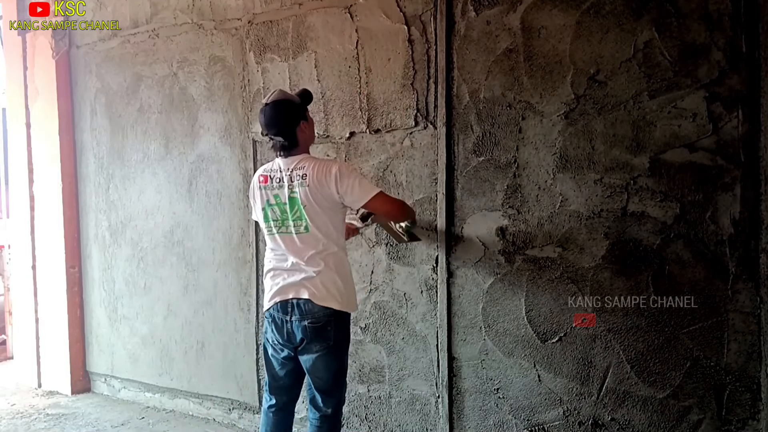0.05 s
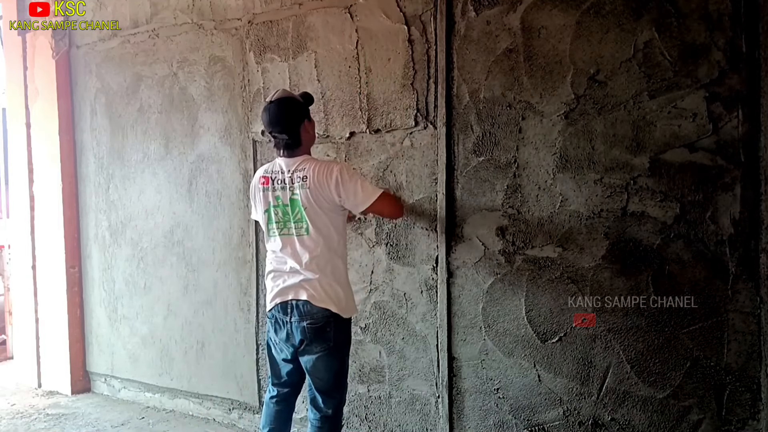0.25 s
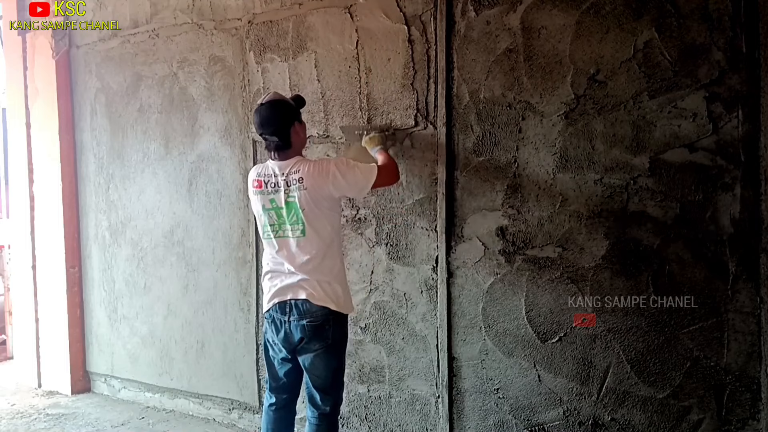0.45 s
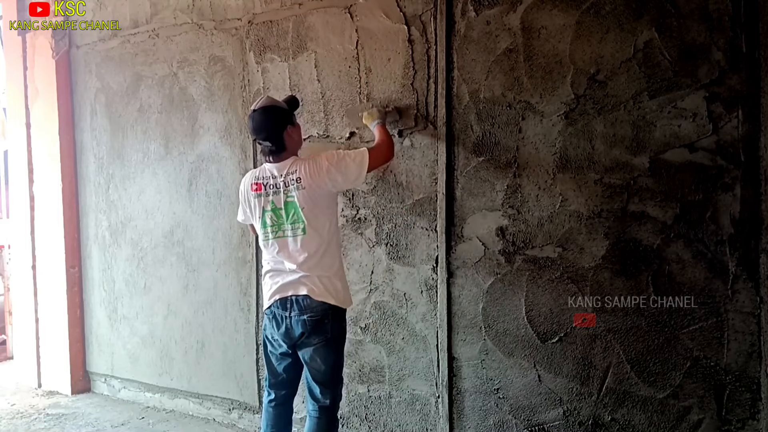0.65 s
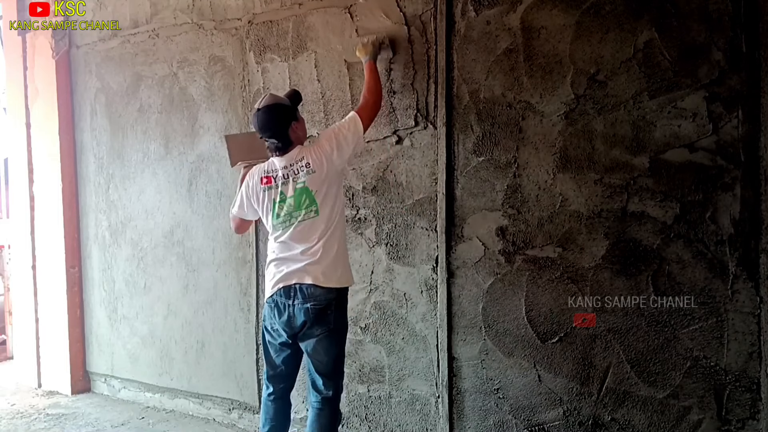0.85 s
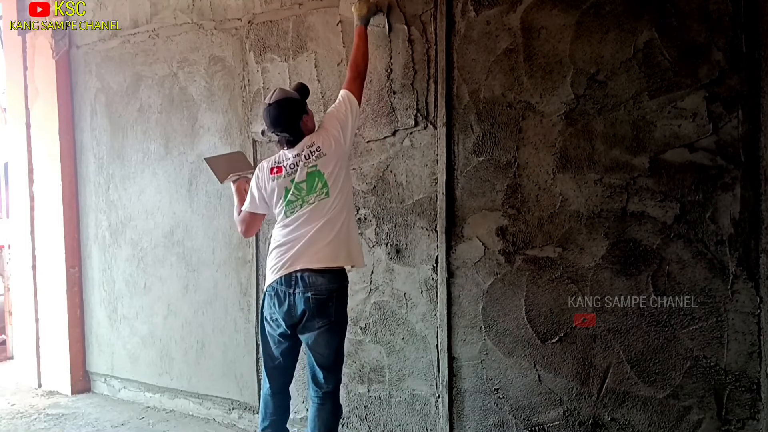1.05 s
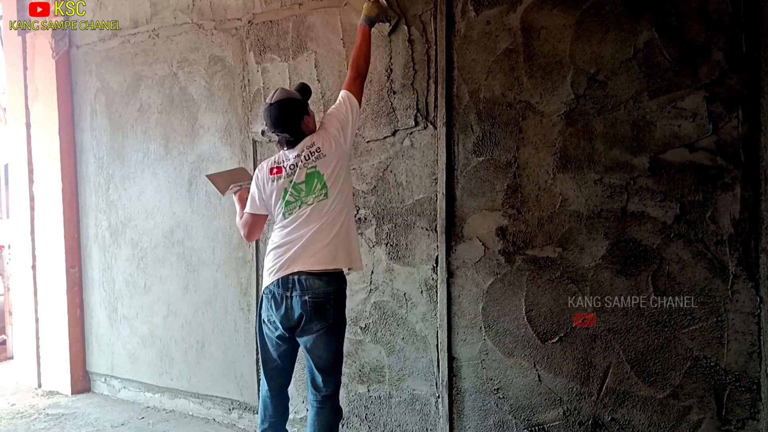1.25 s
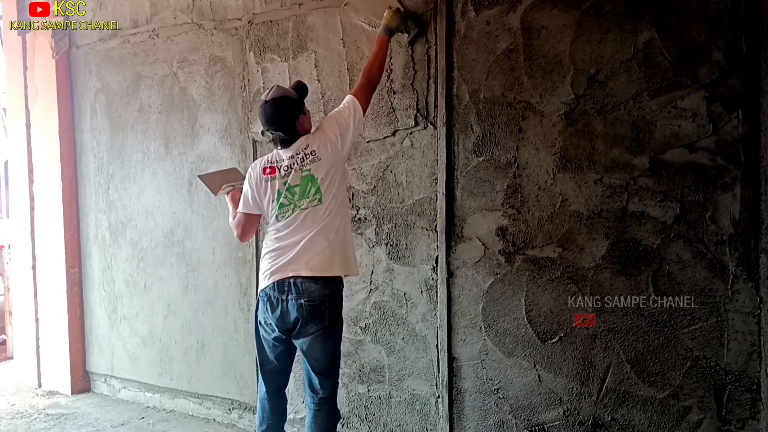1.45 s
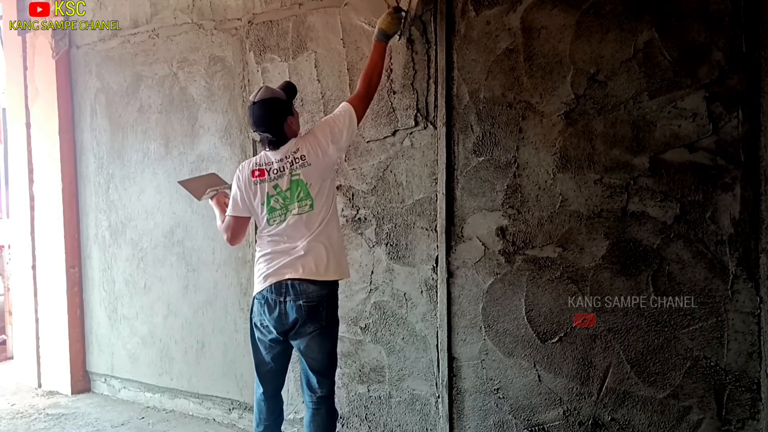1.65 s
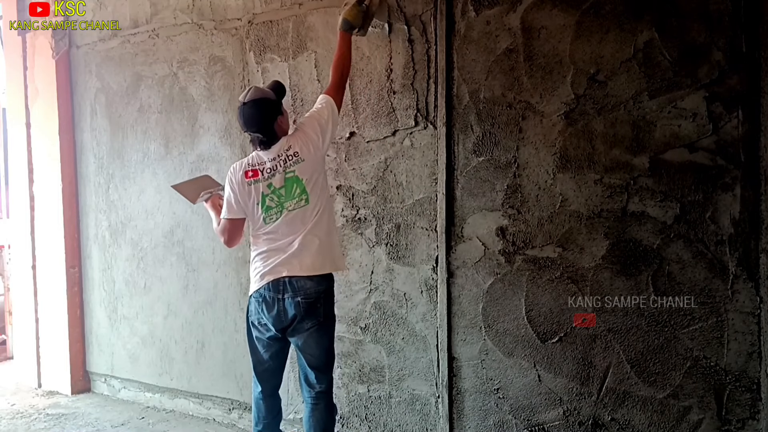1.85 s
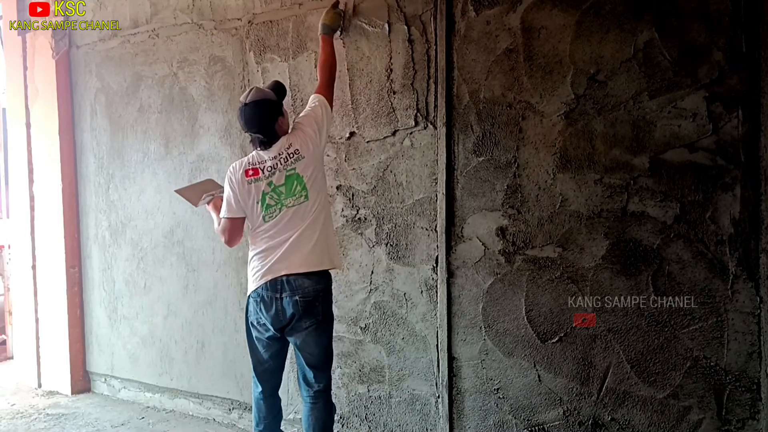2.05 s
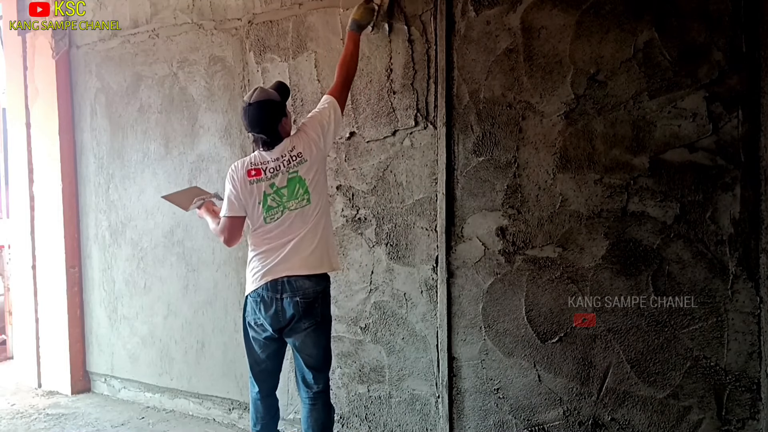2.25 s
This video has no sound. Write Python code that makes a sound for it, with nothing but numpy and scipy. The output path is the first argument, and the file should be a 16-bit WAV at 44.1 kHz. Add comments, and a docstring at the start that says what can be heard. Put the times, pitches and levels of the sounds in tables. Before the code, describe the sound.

A steel trowel knocks on a hand board and scrapes up gritty mortar at 0.2 seconds, over a brief low hum, then again, louder, at 0.5. From 0.8 it spreads the mortar on a wall in soft, hissing strokes, with faint bumps and pebble clinks around 1.4. Two faint high chirps follow after 2.1, then a short rasp at 2.3. The bare room echoes, with low outdoor rumble throughout.

```python
"""A plasterer's steel trowel at work in a bare, echoing room, heard on a close pair of microphones.
Twice it knocks on the hand board and scrapes up mortar, sand grains cracking under the steel; then he
presses the load on the wall and spreads it in long, soft, gritty strokes. The work sounds well back in
the room; pebble clinks, low bumps and two faint high chirps come through drier and seem nearer.
Under it all lie a low outdoor rumble and one short swell of hum."""
import sys
import numpy as np
from scipy import signal
from scipy.fft import rfft, irfft
from scipy.io import wavfile
from scipy.ndimage import uniform_filter1d, map_coordinates

SR = 44100
rng = np.random.default_rng(int(sys.argv[2]) if len(sys.argv) > 2 else 0)


def wav_record(signal):
    """Record a signal, one row per channel, as 16-bit PCM in the file named by sys.argv[1]."""
    frames = np.transpose(np.atleast_2d(signal))
    bounded = np.clip(frames, -1, 1)
    # unit amplitude maps onto the largest positive 16-bit level
    quanta = np.round(bounded * 32767).astype(np.int16)
    wavfile.write(sys.argv[1], SR, quanta)


N = 105840

# rumble from outdoors (frequency [Hz], level [dB])
RUMBLE_SPECTRUM = [(20, -24), (40, -19), (60, -3.5), (82, -1.5), (150, -2), (230, -6.5), (350, -15),
                   (900, -27), (2000, -26), (4000, -37), (15000, -46.5)]
# spreading strokes on the wall (time [s], length [s], level [dB], tilt [dB/octave])
SPREAD_STROKES = [(-.06, 0.086, -52.5, -1.5), (0.845, 0.15, -50, 1), (0.987, 0.23, -47.5, 0.06),
                  (1.214, 0.24, -57, 0.5), (1.464, 0.043, -42.5, 0.5), (1.548, 0.11, -49.5, 1),
                  (1.643, 0.081, -45.5, 1), (1.828, 0.036, -52.5, -0.5), (1.957, 0.06, -56, -2),
                  (2.11, 0.32, -52.5, 0.5)]
# mortar under the flat blade (frequency [Hz], level [dB])
SPREAD_SPECTRUM = [(120, -2), (450, -3.5), (900, -11), (1400, 2.5), (2600, 3.5), (4500, -2.5), (8000, -7),
                   (15000, -8)]
# resonances of the flat blade on the wall (frequency [Hz], width [Hz], level [dB])
SPREAD_MODES = [(561, 140, 11), (866, 95, 9), (1950, 250, -5)]
# pebbles tick on the steel (time [s], level [dB])
PEBBLE_HITS = [(0.027, -58), (1.388, -39.5), (1.486, -46.5)]
# modes of the blade (frequency [Hz], level [dB], t60 [s])
BLADE_MODES = [(2650, -15, 0.017), (3086, 1, 0.074), (3500, 5, 0.016), (3800, -7, 0.011), (7800, -14, .03),
               (9300, -11, 0.033)]
# crack of a pebble on steel (frequency [Hz], level [dB])
PEBBLE_SPECTRUM = [(300, 7), (1800, -30), (2600, -3), (3700, -1), (4800, -13), (9000, -8), (15000, -9)]
# mortar and trowel thud on board or wall (time [s], length [s], level [dB], centre [Hz], width [Hz])
MORTAR_SLAPS = [(0.182, 0.033, -40, 257, 220), (0.529, 0.022, -25, 589, 200),
                (1.377, 0.026, -53.5, 555, 590), (1.483, .012, -48, 825, 500),
                (1.702, 0.013, -44.5, 904, 181)]
# the trowel knocks on the board (time [s], level [dB], t60 [s], tilt [dB/octave])
BOARD_KNOCKS = [(0.1858, -18, 0.0093, -0.5), (0.527, -17.5, 0.097, -1)]
# crack of steel on the board (frequency [Hz], level [dB])
KNOCK_SPECTRUM = [(70, -30), (200, -7), (500, 5), (2200, 6.5), (3200, -6), (8000, -9), (15000, -8)]
# force of the blade on the board, one curve a scoop (time [s], level [dB])
SCOOP_FORCES = [
    [(.186, -51), (.196, -34), (.201, -21), (.228, -22), (.275, -27.5), (.315, -35), (.35, -52), (.40, -70)],
    [(.513, -54), (.526, -39), (.529, -34.5), (.56, -22.5), (.598, -18), (.65, -27.5), (.668, -34.5),
     (.74, -36), (.79, -63)],
]
# brightness of each scoop (tilt [dB/octave])
SCOOP_TILTS = [0.26, -0.4]
# sand under the blade (frequency [Hz], level [dB])
SCOOP_SPECTRUM = [(100, -39.5), (230, -23), (400, -4.5), (750, -5.5), (1250, 0), (2300, -4), (3200, -6.5),
                  (4300, -12), (8000, -15.5), (15000, -18.5)]
# resonances of blade and board pressed together (frequency [Hz], width [Hz], level [dB])
SCOOP_MODES = [(1136, 18, -4), (1216, 38, 6), (1655, 32, 12.5), (1988, 55, 12), (2400, 180, 5.5),
               (3258, 27, 11.5)]
# the loaded blade drags off the board
# (time [s], length [s], level [dB], tilt [dB/octave], ring start [Hz], ring end [Hz], ring level [dB])
DRAG_STROKES = [(0.265, 0.031, -35.5, 2, 398, 473, -5.5), (0.334, 0.0578, -44, 0, 1852, 1990, 0),
                (0.616, 0.0709, -27.5, 2, 800.7, 700, -5), (0.684, 0.078, -31, 1.55, 700, 858, -7.5)]
# rasp of wet sand (frequency [Hz], level [dB])
DRAG_SPECTRUM = [(100, -23), (220, -13), (340, -5.5), (850, 0), (1300, -11), (2400, -6.5), (3500, -15.5),
                 (6000, -31.5), (15000, -32)]
# resonances of the board as the blade leaves (frequency [Hz], width [Hz], level [dB])
BOARD_MODES = [(347, 48, 7.5), (708, 62, 4.5), (1635, 70, 4.5), (1972, 54, 11.5), (2200, 90, 3)]
# low bumps (time [s], length [s], level [dB], centre [Hz])
LOW_BUMPS = [(0.531, 0.025, -33, 290.3), (0.844, 0.045, -40.5, 195), (0.987, 0.025, -45.5, 90),
             (1.553, 0.035, -49, 79.6), (1.73, 0.024, -46, 125), (1.943, 0.029, -45, 102)]
# faint chirps (time [s], length [s], middle pitch [Hz], arch [Hz], glide middle to end [Hz], level [dB])
HIGH_CHIRPS = [(2.099, 0.037, 3775, 499.5, 1, -50.5), (2.229, 0.044, 3630, 1, -230, -48.5)]
# the blade edge bites the rough wall (time [s], length [s], level [dB], tilt [dB/octave])
BITE_STROKES = [(2.291, 0.032, -35.5, -2), (2.333, 0.041, -41.5, 2.5)]
# rasp of the edge (frequency [Hz], level [dB])
BITE_SPECTRUM = [(200, -18.5), (700, -16), (1050, -2), (2200, 1), (3200, -5), (5000, -10.5), (15000, -13)]
# decay of the bare room (frequency [Hz], t60 [s])
ROOM_DECAY = [(150, 0.64), (700, 0.66), (2000, 0.57), (5000, 0.39), (14000, 0.24)]
# left microphone minus right (frequency [Hz], level [dB])
LEFT_MINUS_RIGHT = [(60, -2.5), (300, 0), (1300, -0.8), (2400, -1), (4400, -1.5), (8000, -3.5), (13000, 3)]

SCOOP_GRAINS_PER_S, WALL_GRAINS_PER_S = 5000, 9000
ROOM_BUILD_S, EARLY_DECAY_S, EARLY_GAIN, SPOT_STEP_S = 0.0008, 0.044, 1.7, 0.012
MIC_LAG_S, ECHO_APART_HZ = 0.00007, 625
LOW_CUT_HZ, TOP_CUT_HZ = 32, 15600


def undb(db):
    """Decibels to gain."""
    return 10 ** (np.asarray(db) / 20)


def unit(x):
    """Scale to rms 1."""
    return x / np.sqrt(np.mean(x ** 2) + 1e-20)


def on_log(points, hz):
    """Read (frequency, value) points on a log-frequency axis."""
    p = np.array(points, float)
    return np.interp(np.log(hz + 1), np.log(p[:, 0]), p[:, 1])


def freqs():
    """Frequencies of the padded spectrum."""
    return np.arange(N + 1) * SR / (2 * N)


def colour(x, spectrum, modes=(), tilt=0):
    """Causal filter of unit power: a broad spectrum, resonances on top, and a tilt about 1 kHz."""
    f = freqs()
    power = 1 + sum(undb(db) ** 2 / (1 + (2 * (f - hz) / width) ** 2) for hz, width, db in modes)
    octaves = np.log2(np.clip(f, 200, 8000) / 1000)
    gain = unit(undb(on_log(spectrum, f) + tilt * octaves) * np.sqrt(power))
    cepstrum = irfft(np.log(gain))
    cepstrum[1:N] *= 2  # minimum phase: nothing rings before its hit
    cepstrum[N + 1:] = 0
    return irfft(rfft(x, 2 * N) * np.exp(rfft(cepstrum)))[..., :N]


def walk(rate_hz):
    """Smooth random wander of rms 1."""
    span = max(int(SR / rate_hz), 2)
    smoothed = uniform_filter1d(rng.standard_normal(N), span, mode="wrap")
    return unit(uniform_filter1d(smoothed, span, mode="wrap"))


def envelope(t, start, length, attack, release):
    """Rise, hold, then an exponential fall."""
    return np.clip((t - start) / attack, 0, 1) * np.exp(-np.maximum(t - start - length, 0) / release)


def grit(grains_per_s, spread_db, judder_db, judder_hz):
    """Sand grains of uneven size crack under steel that sticks and slips."""
    hit = rng.random(N) < grains_per_s / SR
    size = undb(spread_db * np.minimum(rng.exponential(size=N), 4)) * rng.choice([-1, 1], N)
    return unit(hit * size * undb(judder_db * walk(judder_hz)))


def resonance(hz, width_hz):
    """A randomly driven resonance of rms 1 whose centre can move."""
    pole = np.exp(-np.pi * abs(width_hz) / SR)
    drift = signal.lfilter([1], np.poly([pole, pole]), rng.standard_normal((2, N)))
    carrier = np.exp(2j * np.pi * np.cumsum(hz) / SR)
    return unit(((drift[0] + 1j * drift[1]) * carrier).real)


def outdoor_rumble(level_db=-51, apart_hz=700):
    """A restless low rumble: alike at both microphones in the bass, unrelated in the treble."""
    mid, side = rng.standard_normal((2, N))
    side = irfft(rfft(side, 2 * N) * freqs() / np.hypot(freqs(), apart_hz))[:N]
    pair = np.array([mid + side, mid - side])
    return undb(level_db) * unit(colour(pair, RUMBLE_SPECTRUM)) * undb(walk(7.7))


def wall_spreads(t):
    """Mortar hisses between the flat blade and the wall."""
    sand = grit(WALL_GRAINS_PER_S, spread_db=6.0, judder_db=-1.5, judder_hz=90)
    out = 0
    for start, length, db, tilt in SPREAD_STROKES:
        stroke = sand * envelope(t, start, length, attack=0.047, release=0.02)
        out += undb(db) * colour(stroke, SPREAD_SPECTRUM, SPREAD_MODES, tilt)
    return out


def pebble_clinks(t):
    """A pebble cracks against the steel and the blade rings briefly."""
    out = 0
    for start, db in PEBBLE_HITS:
        age = np.maximum(t - start, 0)
        ring = sum(undb(mode_db - 60 * age / t60) * np.sin(2 * np.pi * hz * age)
                   for hz, mode_db, t60 in BLADE_MODES)
        crack = rng.standard_normal(N) * (t >= start) * np.exp(-age / 0.0036)
        out += undb(db) * (0.6 * ring + 1.8 * colour(crack, PEBBLE_SPECTRUM))
    return out


def hum(t, hz=91.7, level_db=-42.5, peak_s=0.17, width_s=0.044):
    """A low tone that swells once."""
    swell = np.exp(-((t - peak_s) / width_s) ** 2 / 2)
    return undb(level_db) * np.sqrt(2) * swell * np.sin(2 * np.pi * hz * t)


def mortar_slaps(t):
    """Dull bursts as the soft mass lands on board or wall."""
    f, out = freqs(), 0
    for start, length, db, hz, width in MORTAR_SLAPS:
        detune = (f / hz - hz / (f + 1)) * hz / (2 * width)
        band = 1 / (1 + 1j * detune) ** 3
        band /= np.sqrt(np.mean(abs(band) ** 2))
        push = rng.standard_normal(N) * envelope(t, start, length, attack=0.0016, release=0.0087)
        out += undb(db) * irfft(rfft(push, 2 * N) * band)[:N]
    return out


def board_knocks(t):
    """A short crack where steel meets the hand board."""
    out = 0
    for start, db, t60, tilt in BOARD_KNOCKS:
        age = np.maximum(t - start, 0)
        crack = rng.standard_normal(N) * (t >= start) * undb(-60 * age / t60)
        out += undb(db) * colour(crack, KNOCK_SPECTRUM, tilt=tilt)
    return out


def board_scoops(t, full_force_db=-18.5):
    """The blade grinds across the board; the harder it presses, the more the two ring together."""
    sand = grit(SCOOP_GRAINS_PER_S, spread_db=3.5, judder_db=1.0, judder_hz=220)
    out = 0
    for curve, tilt in zip(SCOOP_FORCES, SCOOP_TILTS):
        times, force_db = np.transpose(curve)
        force = np.interp(t, times, undb(force_db), left=0, right=0)
        pressed = np.clip(force / undb(full_force_db), 0, 1) ** 2
        out += colour(force * (1 - pressed) * sand, SCOOP_SPECTRUM, tilt=tilt)
        out += colour(force * pressed * sand, SCOOP_SPECTRUM, SCOOP_MODES, tilt)
    return out


def board_drags(t):
    """The loaded blade slides off the board; its main resonance shifts as the contact moves."""
    wet_sand = grit(SCOOP_GRAINS_PER_S, spread_db=3.5, judder_db=2.0, judder_hz=149)
    out = 0
    for start, length, db, tilt, start_hz, end_hz, ring_db in DRAG_STROKES:
        ring = resonance(np.interp(t, [start, start + length], [start_hz, end_hz]), width_hz=190)
        rasp = colour(wet_sand, DRAG_SPECTRUM, BOARD_MODES, tilt)
        contact = envelope(t, start, length, attack=0.015, release=0.013)
        out += undb(db) * contact * (rasp + undb(ring_db) * ring)
    return out


def low_bumps(t):
    """Soft bumps, each a broad band of low noise."""
    out = 0
    for start, length, db, hz in LOW_BUMPS:
        body = resonance(np.full(N, hz), width_hz=0.55 * hz)
        out += undb(db) * envelope(t, start, length, attack=0.012, release=0.023) * body
    return out


def chirps(t):
    """Short whistles that arch or fall, with an unsteady pitch."""
    out, waver = 0, 1 + 0.0247 * walk(710)
    for start, length, hz, arch, glide, db in HIGH_CHIRPS:
        along = np.clip(2 * (t - start) / length - 1, -1, 1)
        pitch = (hz - arch * along ** 2 + glide * along) * waver
        out += undb(db) * (1 - along ** 2) * np.sqrt(2) * np.sin(2 * np.pi * np.cumsum(pitch) / SR)
    return out


def edge_bites(t):
    """The blade's edge rasps on the rough wall."""
    coarse_sand = grit(SCOOP_GRAINS_PER_S, spread_db=1.5, judder_db=1.2, judder_hz=200)
    out = 0
    for start, length, db, tilt in BITE_STROKES:
        stroke = coarse_sand * envelope(t, start, length, attack=0.0046, release=0.024)
        out += undb(db) * colour(stroke, BITE_SPECTRUM, tilt=tilt)
    return out


def masonry_echo(size=32768):
    """Bare walls answer from one spot: strong near reflections, then a tail whose treble dies first."""
    t = np.arange(size) / SR
    f = np.arange(size // 2 + 1) * SR / size
    apart = f / np.hypot(f, ECHO_APART_HZ)  # the microphones differ more in the treble
    mid, side = rfft(rng.standard_normal((2, size)))
    pair = np.array([mid + apart * side, mid - apart * side]) / np.hypot(1, apart)
    build = 1 - np.exp(-t / ROOM_BUILD_S)
    early = EARLY_GAIN * np.exp(-t / EARLY_DECAY_S)
    out = 0
    for band_hz, t60 in ROOM_DECAY:
        band = on_log([(hz, hz == band_hz) for hz, _ in ROOM_DECAY], f)
        fade = build * (undb(-60 * t / t60) + early)
        out += irfft(pair * band) * fade / np.sqrt(np.sum(fade ** 2))
    return out


def room(x, t, echo_db, spots):
    """Direct sound plus echo; as the source moves, the reflections and the lag between microphones shift."""
    echo = 0
    for spot in range(spots):
        away = (t / SPOT_STEP_S - spot + spots / 2) % spots - spots / 2
        here = np.sqrt(np.clip(1 - abs(away), 0, 1))
        echo += signal.oaconvolve((x * here)[None], masonry_echo(), axes=1)[:, :N]
    right = map_coordinates(x, [(t + MIC_LAG_S * walk(12)) * SR], mode="nearest")
    direct = np.array([x, right])
    return (direct + undb(echo_db) * echo) / np.sqrt(1 + undb(echo_db) ** 2 / 2)


def scene():
    """The handwork fills the room; clinks, bumps and chirps arrive more directly, over rumble and hum."""
    t = np.arange(N) / SR
    work = board_scoops(t) + board_drags(t) + board_knocks(t) + mortar_slaps(t)
    work += wall_spreads(t) + edge_bites(t)
    far = room(work, t, echo_db=3, spots=7)
    near = room(pebble_clinks(t) + low_bumps(t) + chirps(t), t, echo_db=-12.5, spots=2)
    return far + near + outdoor_rumble() + hum(t)


def record(dry):
    """Two slightly unlike microphones, a low cut and a steep top cut."""
    f = freqs()
    lean_db = on_log(LEFT_MINUS_RIGHT, f) / 2
    balance = undb([lean_db, -lean_db])
    low_cut = f ** 2 / np.hypot(f ** 2, LOW_CUT_HZ ** 2)
    heard = irfft(rfft(dry, 2 * N) * balance * low_cut)[:, :N]
    top_cut = signal.ellip(10, .2, 80, TOP_CUT_HZ, fs=SR, output="sos")
    return signal.sosfilt(top_cut, heard)


dry = scene()
out = record(dry)
wav_record(out)
```